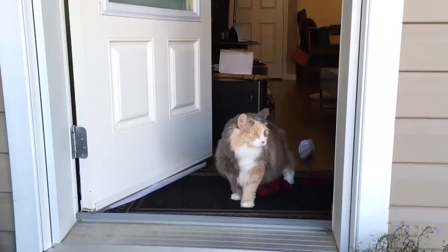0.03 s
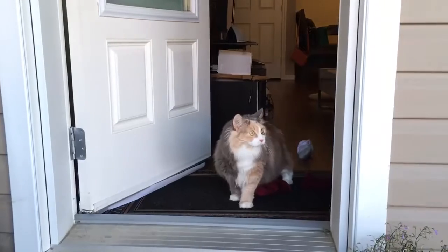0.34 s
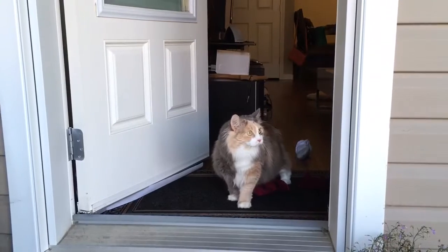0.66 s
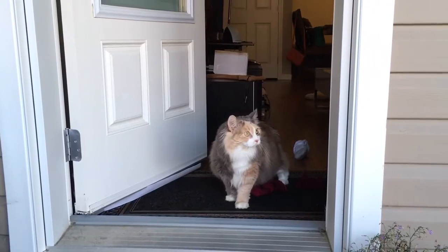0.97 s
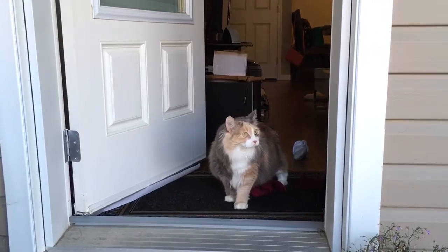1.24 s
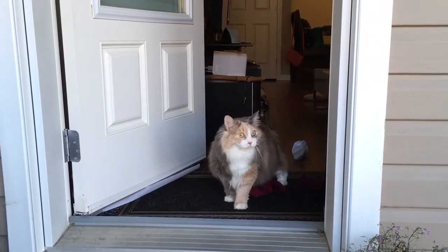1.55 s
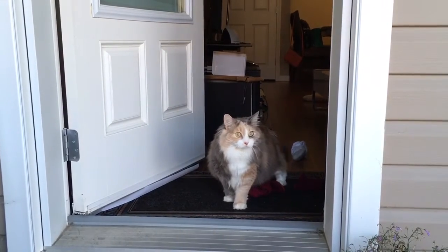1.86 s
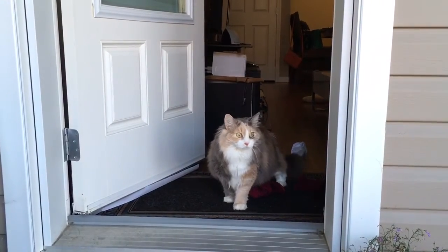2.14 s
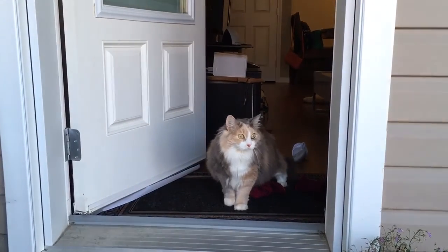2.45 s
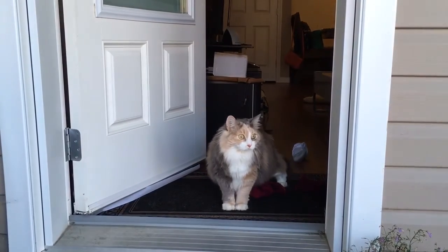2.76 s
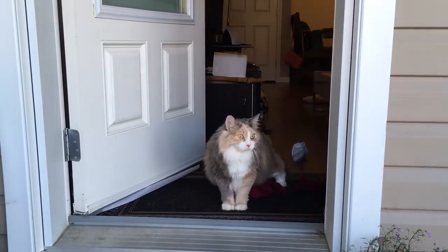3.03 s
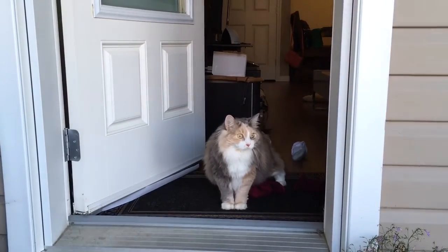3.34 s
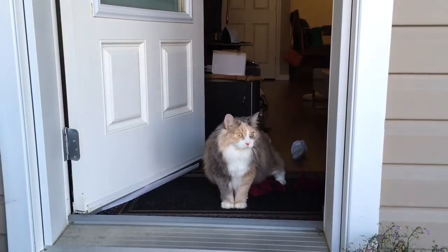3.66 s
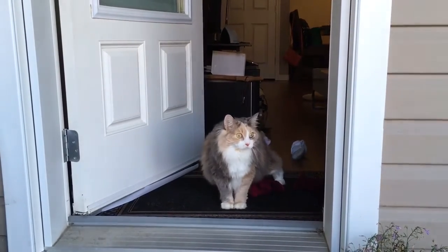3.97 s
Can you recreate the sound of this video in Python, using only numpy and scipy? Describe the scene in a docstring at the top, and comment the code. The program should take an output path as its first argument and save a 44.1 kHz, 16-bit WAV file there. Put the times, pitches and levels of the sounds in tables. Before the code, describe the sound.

A small bird near a house doorway gives three sharp, very high chirps at about 0.6, 1.9 and 3 seconds, each dropping quickly in pitch with a short echo. Distant traffic rumbles throughout, with soft sleeve rustles and faint far birds, which whistle twice just after 2 seconds. At about 2.3 and 2.9 seconds the hand-held microphone is bumped, making low thuds with a light rattle.

```python
"""Distant traffic rumbles while a sleeve rustles close by and far birds whistle and peep faintly.
A small bird near an open house door gives three sharp, very high chips. Each is a tone that drops
fast in pitch, and the door, wall, porch and yard throw it back as echoes.
Past the middle, a hand-held camera is shifted and bumped twice: its body thuds and its case rattles."""
import sys
import numpy as np
from scipy import signal
from scipy.fft import rfft, irfft
from scipy.io import wavfile
from scipy.ndimage import uniform_filter1d

SR = 44100
rng = np.random.default_rng(int(sys.argv[2]) if len(sys.argv) > 2 else 0)


def generate_wav(sig):
    """Save sig (samples, or channels by samples) to the path in sys.argv[1] as 16-bit PCM at SR."""
    pcm = np.round(np.clip(np.atleast_2d(sig).T, -1, 1) * 32767).astype(np.int16)
    wavfile.write(sys.argv[1], SR, pcm)


N = 176400


def undb(db):
    """Turn decibels into a factor to multiply by."""
    return 10 ** (np.asarray(db) / 20)


def unit(x):
    """Scale a signal so that its average strength (rms) is 1."""
    return x / np.sqrt(np.mean(x ** 2) + 1e-20)


def drift(rate):
    """A smooth random wobble of strength 1 that heads for a new value `rate` times a second."""
    hold = max(int(SR / rate), 2)
    steps = np.repeat(rng.standard_normal(N // hold + 1), hold)
    return unit(uniform_filter1d(uniform_filter1d(steps, hold), hold)[:N])


def noise(colour, tilt_db=0, low_hz=0, top_hz=SR):
    """Noise of strength 1, shaped by (Hz, dB) points, a tilt per octave above 2500 Hz and two edges."""
    hz = np.maximum(np.arange(N // 2 + 1) * SR / N, 1)
    points = np.array(colour, float)
    db = np.interp(np.log(hz), np.log(points[:, 0]), points[:, 1])
    db += tilt_db * np.log2(np.maximum(hz, 2500))
    edges = 1 / np.sqrt((1 + (hz / top_hz) ** 6) * (1 + (low_hz / hz) ** 6))
    return unit(irfft(rfft(rng.standard_normal(N)) * undb(db) * edges, N))


def fade(t, fade_s):
    """Die away from t = 0, losing 60 dB in the fade time."""
    return np.exp(-np.log(1000) * np.maximum(t, 0) / max(fade_s, 1e-3))


def ramp(t, rise_s):
    """Rise smoothly from 0 to 1, starting at t = 0."""
    return np.sin(np.pi / 2 * np.clip(t / max(rise_s, 1e-4), 0, 1)) ** 2


def arch(t, start, length):
    """Swell up and back down once."""
    return np.sin(np.pi * np.clip((t - start) / length, 0, 1))


def echo_wash(sound, fade_s, rise_s):
    """Countless small echoes of a sound that build up, blend and die away."""
    t = np.arange(SR) / SR
    echoes = rng.standard_normal(SR) * fade(t, fade_s) * ramp(t, rise_s)
    return signal.fftconvolve(sound, echoes / np.sqrt(np.sum(echoes ** 2)))[:N]


def phase_of(hz):
    """Add up a changing pitch into the angle of a sine wave."""
    return 2 * np.pi * np.cumsum(hz) / SR


def scattered(hz, spread_hz):
    """A tone that arrives by many paths, so that it flutters and its pitch blurs."""
    phase = phase_of(hz)
    return drift(2 * spread_hz) * np.sin(phase) + drift(2 * spread_hz) * np.cos(phase)


def traffic():
    """Far tyres and engines make a wavering rumble and a low drone, under a soft hiss of air."""
    # tone colour of the traffic (frequency [Hz], level [dB])
    traffic_colour = [(20, -24), (30, -42), (40, -11), (52, -6.5), (66, 2.5), (92, -5), (120, -3.5),
                      (145, -7), (185, -4.5), (230, -12.5), (280, -14.5), (380, -24), (480, -29),
                      (650, -29), (850, -26), (1050, -24.5), (1330, -26.5), (1600, -32.5), (2000, -35.5),
                      (2600, -40), (4000, -109)]
    # hum of the engines (pitch [Hz], level [dB])
    engine_tones = [(73, -59), (118.5, -57.5)]
    # tone colour of the air (frequency [Hz], level [dB])
    air_colour = [(1500, -4.5), (2200, -2.5), (2900, -4), (3400, -6), (4500, -9.5), (7000, -14),
                  (15000, -16.5)]
    rumble = undb(-49.5 + 0.95 * drift(24.72)) * noise(traffic_colour, top_hz=3000)
    drone = np.zeros(N)
    for hz, db in engine_tones:
        level = undb(db + 3.5 * drift(5.7))
        drone += level * np.sin(phase_of(hz * (1 + 0.0259 * drift(10))))
    air = undb(-76.5 + 0.5 * drift(4.57)) * noise(air_colour, low_hz=1680)
    return rumble + drone + air


def sleeve(t):
    """Cloth rubs in short strokes of noise that swell and fade."""
    # strokes (time [s], rise time [s], fade time [s], level [dB], treble tilt [dB per octave])
    strokes = [(.1, 0.025, 1, -73, 4), (.39, 0.019, 0.64, -71, 3), (.73, 0.079, .4, -70.5, 1.5),
               (.97, 0.041, 0.95, -67.5, 2), (1.10, .004, 0.36, -65.5, 7), (1.144, 0.016, 0.21, -58.5, 6),
               (1.292, 0.036, 0.33, -72, 11), (1.525, .016, 0.54, -57, 5), (1.717, 0.005, 0.044, -65, -6),
               (1.859, .003, 0.034, -67, 4), (2.126, 0.0068, 0.28, -62, -3.5),
               (2.308, 0.0091, 0.71, -64.5, -3), (2.351, 0.012, 0.29, -62.5, 2.5),
               (2.409, 0.027, 0.22, -62, -1.5), (2.83, 0.0036, 0.082, -68.5, 1),
               (2.989, .01, 0.14, -64.5, 2), (3.40, 0.018, 0.39, -65.5, -0.5)]
    # tone colour of the cloth (frequency [Hz], level [dB])
    cloth_colour = [(300, -11), (1200, 6), (2200, 2), (2650, 5.5), (3000, 6.5), (3600, 2), (4500, -1),
                    (6000, -5), (10000, -9), (15500, -16.5)]
    rustle = np.zeros(N)
    for start, rise_s, fade_s, db, tilt_db in strokes:
        swell = ramp(t - start, rise_s) * fade(t - start - rise_s, fade_s)
        rustle += undb(db) * swell * noise(cloth_colour, tilt_db, low_hz=300)
    return rustle * undb(drift(60))  # the level flickers by about 1 dB


def far_birds(t):
    """Thin falling peeps, some twitter and two steady whistles, all blurred by distance."""
    # peeps (time [s], level [dB])
    peeps = [(0.252, -83.5), (.66, -80.5), (1.06, -86), (1.43, -83), (1.95, -82), (2.73, -83),
             (3.20, -84.5), (3.54, -85), (3.86, -84)]
    # bits of twitter (time [s], length [s], level [dB])
    twitters = [(0.387, 0.047, -76), (0.776, .18, -79)]
    # whistled notes (time [s], length [s], level [dB])
    notes = [(2.054, .105, -70.5), (2.176, 0.1, -69)]
    peep_hz, peep_fall_hz, peep_s = 5360, 122, 0.17
    twitter_hz, whistle_hz, edge_s = 3000, 2802, 0.028
    calls, whistles = np.zeros(N), np.zeros(N)
    for start, db in peeps:
        hz = peep_hz - peep_fall_hz * np.clip((t - start) / peep_s, 0, 1)
        calls += undb(db) * arch(t, start, peep_s) * scattered(hz, spread_hz=200)
    for start, length, db in twitters:
        calls += undb(db) * arch(t, start, length) * scattered(np.full(N, twitter_hz), spread_hz=230)
    tone = np.sqrt(2) * np.sin(phase_of(whistle_hz * (1 + 0.0043 * drift(110))))
    for start, length, db in notes:
        whistles += undb(db) * tone * ramp(t - start, edge_s) * ramp(start + length - t, edge_s)
    return calls + whistles + undb(-6) * echo_wash(whistles, fade_s=0.13, rise_s=0.0069)


def near_bird(t):
    """Each chip drops fast in pitch, then holds briefly. Gives the tone and the octave above it."""
    # chips (time [s], level [dB], base pitch [Hz])
    chips = [(0.564, -44, 7445), (1.870, -43.5, 7330), (2.988, -42, 7450)]
    # shape of one chip (time [s], pitch above the base [Hz], tone level [dB], octave level [dB])
    chip_shape = [(0, 2747.5, -36, -60), (.003, 3028, -10.5, -45), (.0058, 2503, -8, -13),
                  (.0078, 668, 0.5, -19), (0.01, 63, 1.5, -5), (0.0135, 180, -12.5, -14),
                  (.019, -84, -17, -32)]
    times, *curves = np.array(chip_shape).T
    edge_s, pitch_wobble = 0.001, 0.007
    tone, octave = np.zeros(N), np.zeros(N)
    for start, db, base_hz in chips:
        age = t - start
        above_hz, tone_db, octave_db = (np.interp(age, times, curve) for curve in curves)
        phase = phase_of((base_hz + above_hz) * (1 + pitch_wobble * drift(1500)))
        sounding = ramp(age, edge_s) * ramp(times[-1] - age, edge_s)
        tone += sounding * undb(db + tone_db) * np.sin(phase)
        octave += sounding * undb(db + octave_db) * np.sin(2 * phase)
    return tone, octave


def house_echoes(tone, octave):
    """Door and wall throw the chips straight back; the porch and yard let them linger."""
    # echoes off the door and wall (delay [s], level [dB])
    bounces = [(.004, -4), (.0085, 0), (0.014, 2.5)]
    early = np.zeros(N)
    for delay, db in bounces:
        delayed = np.roll(tone + octave, int(delay * SR))
        early += undb(db) * echo_wash(delayed, fade_s=0.0063, rise_s=0.00051)  # panels smear each echo
    dulled = tone + undb(-13) * octave  # lingering echoes lose most of the octave
    porch = undb(9.5) * echo_wash(dulled, fade_s=0.18, rise_s=0.015)
    yard = undb(-0.5) * echo_wash(dulled, fade_s=0.49, rise_s=0.032)
    return early + porch + yard


def camera_shifts(t):
    """A deep rumble swells as the hand moves the camera."""
    # movements (time [s], length [s], level [dB])
    moves = [(2.286, 0.135, -43.5), (2.9, .14, -55)]
    # tone colour of the rumble (frequency [Hz], level [dB])
    rumble_colour = [(15, -38), (28, -35), (42, -5), (58, 5), (110, -26), (300, -59)]
    return noise(rumble_colour) * sum(undb(db) * arch(t, start, length) for start, length, db in moves)


def camera_bumps(t):
    """Each bump is a cluster of knocks: the camera body thuds while its case rattles and rings."""
    # knocks (time [s], thud level [dB], rattle level [dB], top edge of the rattle [Hz])
    knocks = [(2.312, -29.5, -60, 600), (2.325, -40, -50, 1080), (2.335, -41, -70, 800),
              (2.356, -40.5, -51.5, 1110), (2.364, -43, -50.5, 1120), (2.382, -36.5, -68, 1000),
              (2.418, -48, -65, 1210), (2.892, -41, -52.5, 2980), (2.897, -31, -46, 12000),
              (2.916, -46, -55, 3520), (2.927, -46.5, -67, 3000), (2.976, -42.5, -68, 1000)]
    # low ringing tones of the body (pitch [Hz], level [dB], fade time [s])
    body_tones = [(78, -19, 0.18), (182, -8.5, 0.077), (212.4, 1, 0.13), (235.2, -10.5, 0.13),
                  (356, -8, 0.077)]
    # high ringing tones of the case (pitch [Hz], level [dB], fade time [s])
    case_tones = [(1030, -10, 0.12), (1391, -2, .09), (1500, -5, 0.093), (1603, 0, 0.054),
                  (2410, -10, 0.12), (2546, -7.5, 0.12), (2600, -24, .1), (4250, -11, 0.091),
                  (4520, -16, 0.07)]
    # tone colour of the rattle (frequency [Hz], level [dB])
    rattle_colour = [(200, -19), (500, -6.5), (800, -3), (1020, -0.5), (1250, -0.5), (1480, -14),
                     (2100, -11), (2500, -4.5), (2900, -16), (4300, -12.5), (5200, -21), (15000, -16.5)]
    out, age = np.zeros(N), t[:SR // 2]
    body = sum(undb(db) * np.sin(2 * np.pi * hz * age) * fade(age, fade_s)
               for hz, db, fade_s in body_tones)
    thud = body * ramp(age, rise_s=0.0023)  # a soft push starts it gently
    for start, thud_db, rattle_db, top_hz in knocks:
        ring = np.zeros(len(age))
        for hz, db, fade_s in case_tones:
            level = undb(db) / np.hypot(1, (hz / top_hz) ** 3)  # only hard knocks reach the high tones
            detuned_hz = hz * (1 + 0.0098 * rng.standard_normal())
            ring += level * np.sin(2 * np.pi * detuned_hz * age) * fade(age, fade_s)
        knock = undb(thud_db) * thud + undb(rattle_db) * ring
        out += np.interp(t - start, age, knock, left=0, right=0)  # place it at its time
        burst = ramp(t - start, rise_s=0.0014) * fade(t - start, fade_s=0.14)
        out += undb(rattle_db) * burst * noise(rattle_colour, top_hz=top_hz)
    room = undb(-10.5) * echo_wash(out, fade_s=0.69, rise_s=0.029)
    return out + room


def scene():
    """All the sounds add up at one microphone."""
    t = np.arange(N) / SR
    background = traffic() + sleeve(t) + far_birds(t)
    tone, octave = near_bird(t)
    bird = tone + octave + house_echoes(tone, octave)
    return (background + bird + camera_shifts(t) + camera_bumps(t))[None]


def record(dry):
    """The sound opens after a moment of silence, and the very highest treble is cut off steeply."""
    start_s, top_hz = 0.118, 15750
    opened = dry * ramp(np.arange(N) / SR - start_s, rise_s=0.0025)
    treble_cut = signal.ellip(10, 0.2, 80, top_hz, fs=SR, output="sos")
    return signal.sosfilt(treble_cut, opened)


dry = scene()
out = record(dry)
generate_wav(out)
```